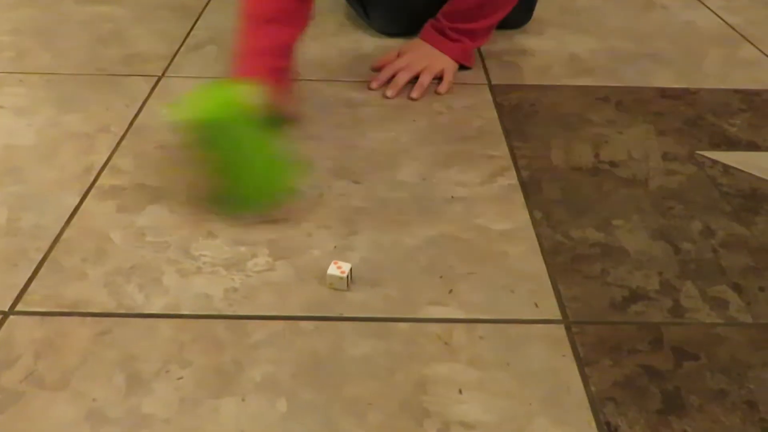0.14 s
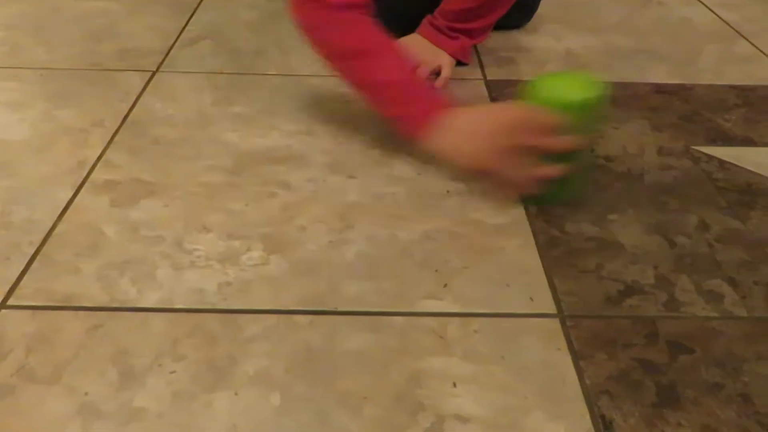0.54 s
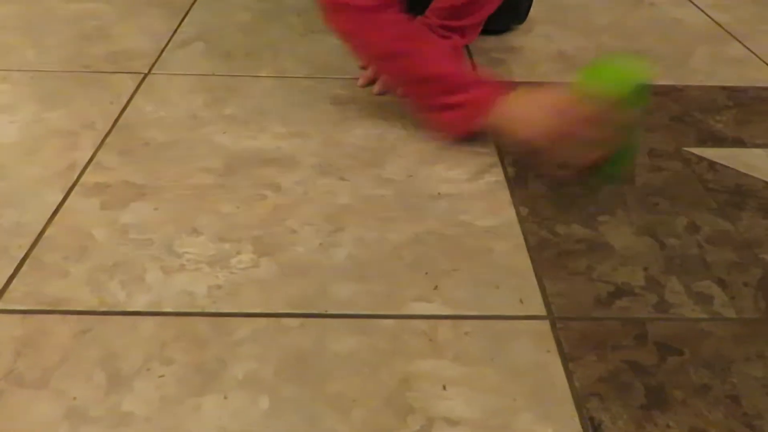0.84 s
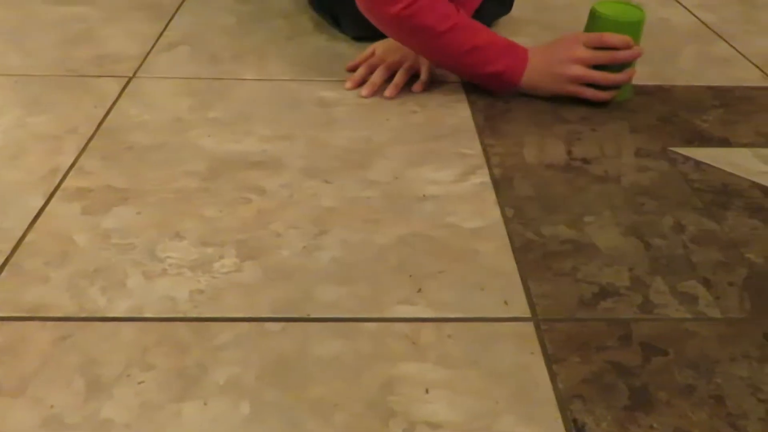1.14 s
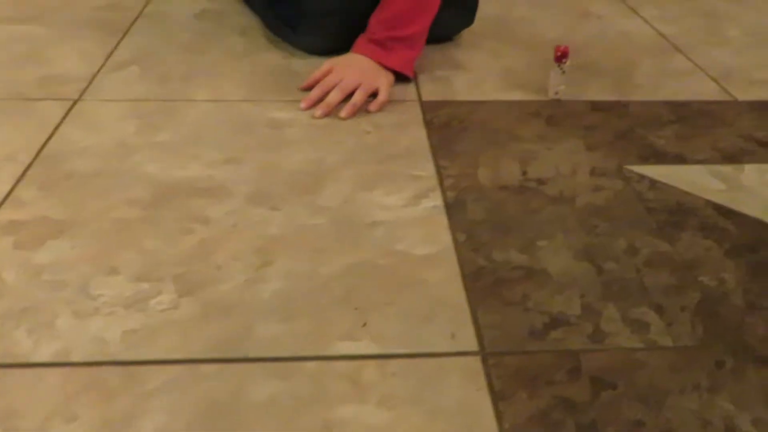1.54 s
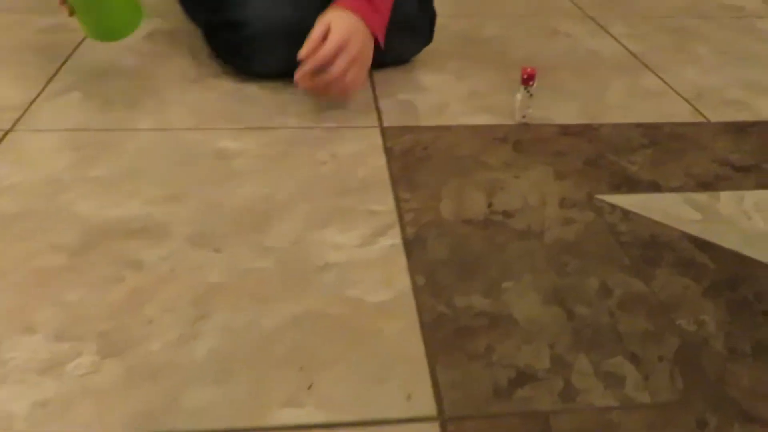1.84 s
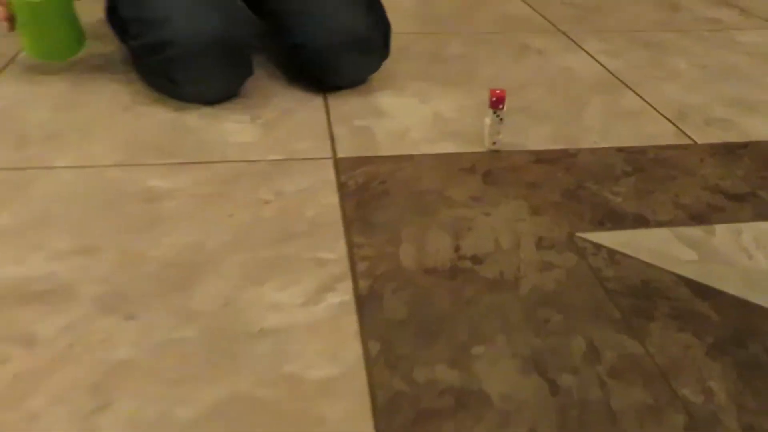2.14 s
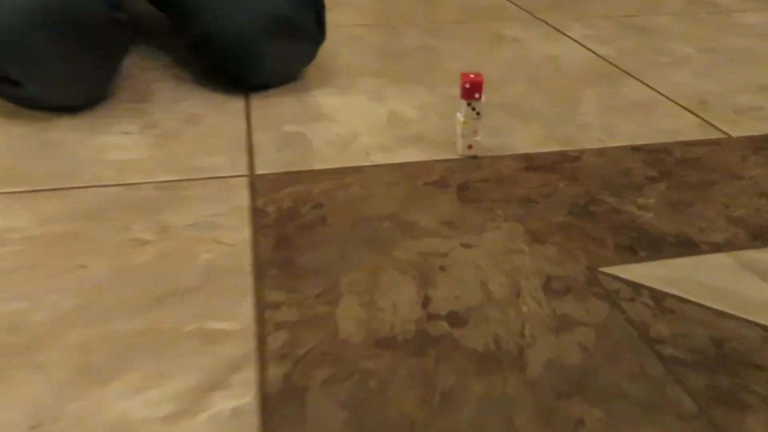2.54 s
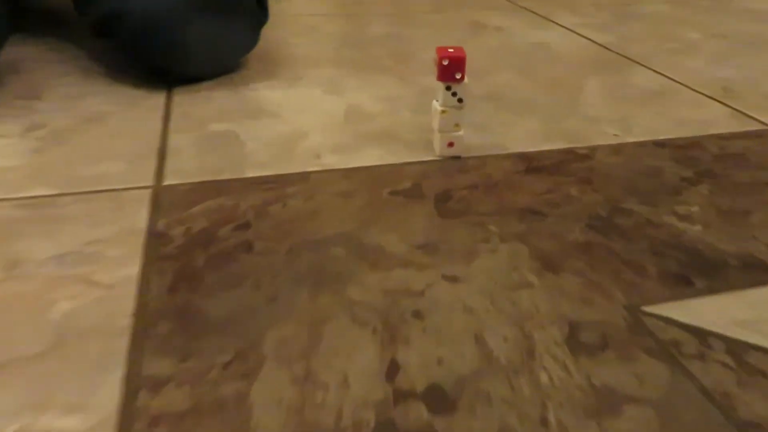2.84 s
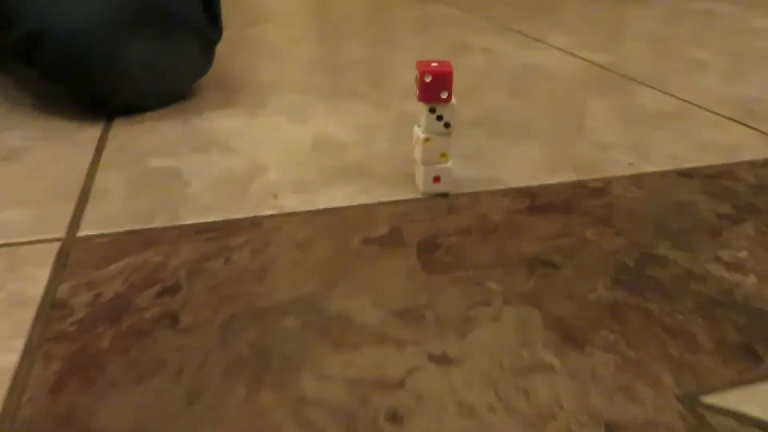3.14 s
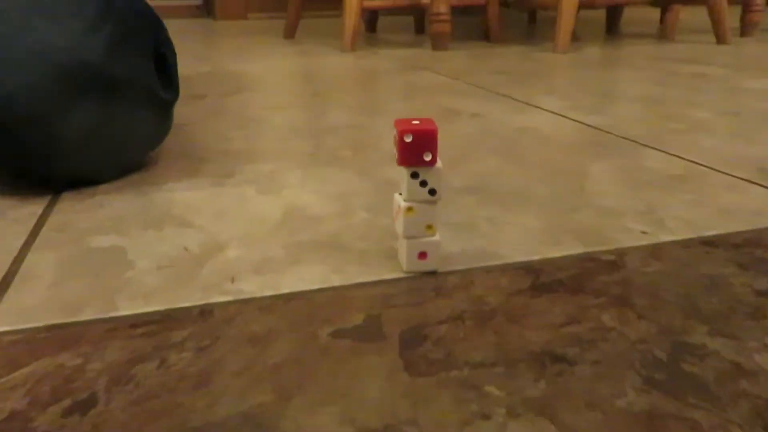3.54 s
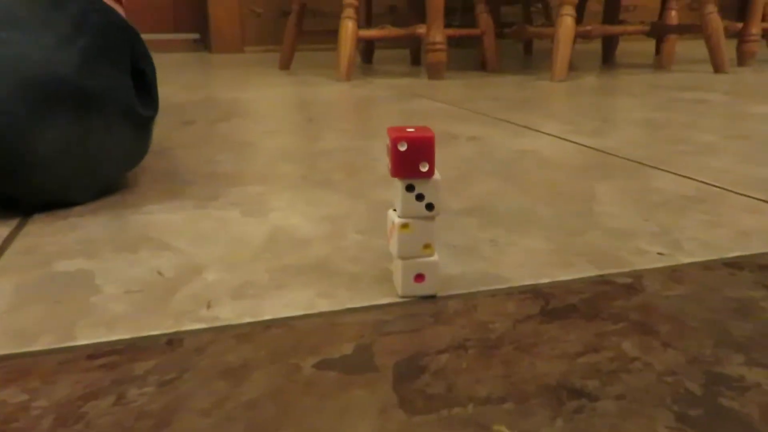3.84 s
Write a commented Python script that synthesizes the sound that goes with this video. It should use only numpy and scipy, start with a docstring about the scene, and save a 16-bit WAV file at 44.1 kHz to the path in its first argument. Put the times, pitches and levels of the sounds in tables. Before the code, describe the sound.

Dice rattle in a plastic cup from the start, grinding and clacking with hollow hoots at the swings, hardest around 0.45-0.5 seconds. From 0.64 the cup scrapes grittily over hard tile, stopping sharply at 1.0 with a short bright room echo. Low hum and rumble swell with soft hiss. A strong dull knock lands at 2.8 with a faint hollow tone, then light scuffs at 3.05 and weaker knocks at 3.3 and 3.8, with barely audible squeaks.

```python
"""Dice in a swung cup

Dice, modelled as friction bursts and clicks, grind and clack round a plastic cup swung from side to side;
its air column, a stirred resonance and short sine swells, hoots at each turn.
The cup comes down on floor tiles, scrapes along and stops; decaying noise makes the hard room ring on.
A low hum, rumble and hiss come up, with a few dull knocks (pulses), a hollow tone, scuffing taps (noise)
and faint squeaks (jittered sines)."""
import sys
import numpy as np
from scipy import signal
from scipy.fft import rfft, irfft, next_fast_len
from scipy.io import wavfile
from scipy.ndimage import map_coordinates

SR = 44100
rng = np.random.default_rng(int(sys.argv[2]) if len(sys.argv) > 2 else 0)


def pcm_store(signal):
    """Save signal as 16-bit PCM."""
    levels = np.round(np.clip(np.atleast_2d(signal), -1, 1) * 32767)
    wavfile.write(sys.argv[1], SR, levels.astype(np.int16).T)


N = 176400

# Contact with the tiles, and fade at its end
SCRAPE_START_S, SCRAPE_STOP_S, RELEASE_S = 0.635, 1.009, 0.016

# Resonances of the plastic wall: centre_hz, width_hz, level_db
CUP_MODES = [(860, 140, -8), (1028, 27, -8.5), (1540, 19, -4), (1595, 45, 11.5), (1603, 120, 4),
             (1890, 10, 7), (2070, 190, -1.5), (2473, 72, 0), (2631, 20, -6.5), (2976, 28, -2.5),
             (3440, 38, -3.5), (5060, 110, -6.5)]
# Dice sliding on the wall: time_s, level_db
SLIDE = [(0.0, -37), (0.238, -34), (0.314, -50.5), (0.322, -33), (0.362, -40.5), (0.372, -34.5),
         (0.384, -37), (0.438, -31.5), (0.446, -21), (0.496, -33), (0.502, -35.5), (0.534, -33),
         (0.63, -41.5)]
# Colour of the sliding: freq_hz, level_db
SLIDE_COLOUR = [(120, -74.5), (200, -51), (283, -20.5), (378, -15.5), (564, 1), (677, -18.5), (742, 1),
                (1190, -9.5), (1620, -14.5), (2750, -17), (3360, -17.5), (3900, -18.5), (5100, -17.5),
                (12000, -30.5), (15500, -40)]
# Air column stirred by the dice: time_s, level_db, pitch_hz
AIR_COLUMN = [(0, -30, 658.3), (.06, -34, 676.3), (.115, -36.5, 626.8), (.17, -34, 591.5),
              (.24, -29.5, 603.3), (.31, -41, 620), (.39, -41, 650), (.45, -23, 670.8), (.53, -54, 609),
              (.62, -36.5, 613), (.66, -34.5, 498.8), (.73, -50.5, 471.3), (.795, -29.5, 527),
              (.84, -50, 571), (.9, -40.5, 561)]
# Hollow bumps: dice against the wall at the turns, then two more during the scrape: start_s, level_db,
# air_pitch_hz, length_s
BUMPS = [(0.134, -17, 590, 0.016), (0.15, -17, 553, 0.014), (.160, -9, 601, 0.026),
         (0.19, -9.5, 591, 0.013), (0.211, -19, 630, 0.011), (0.415, -23, 688, 0.015),
         (0.428, -16, 656, 0.011), (0.4433, -5, 656, 0.011), (.456, -11, 713, 0.0095),
         (0.472, -16.5, 617, 0.013), (0.491, -15.5, 604, 0.014), (.509, -18.5, 556, 0.012),
         (.787, -21, 535, 0.026), (.911, -24, 565, .02)]


def swinging_cup(air_width_hz=75, bump_skew=0.75):
    """Dice grind round the wall and stir the air column; bumps sound as short hollow sine swells."""
    slide_db, = curves(SLIDE)
    air_db, air_hz = curves(AIR_COLUMN)
    rub = contacts(rate_hz=500, scatter_db=3, life_s=0.0008, smooth=0.45)
    wall = amp(-9.5) * unit(resonate(rub, CUP_MODES))
    grind = (unit(coloured(rub, SLIDE_COLOUR)) + wall) * amp(slide_db + 3.5)
    air = hoot(air_hz, air_width_hz, skirt_hz=155) * amp(air_db - 1.0)
    out = grind * gate(0, SCRAPE_START_S, 0.04) + air * gate(0, SCRAPE_STOP_S, RELEASE_S)
    for start_s, level_db, pitch_hz, length_s in BUMPS:
        t = np.arange(int(length_s * SR)) / SR
        swell = np.sin(np.pi * (t / length_s) ** bump_skew)  # skew below 1: rises faster than it dies
        add(out, start_s, amp(level_db) * swell * np.sin(2 * np.pi * pitch_hz * t))
    return out


# Rim and dice over the tiles: time_s, body_db, treble_db, bass_db
SCRAPE = [(0.63, -35, -45.5, -52), (0.664, -26, -36, -31), (0.672, -19.5, -34, -31),
          (0.68, -23.5, -35, -44.5), (0.728, -25, -41.5, -35), (0.804, -32.5, -28, -46),
          (0.81, -19.5, -40.5, -27.5), (0.818, -30, -35.5, -34.5), (0.834, -19.5, -32.5, -37),
          (0.86, -21, -31.5, -52.5), (0.892, -20, -25, -37.5), (0.926, -20.5, -24, -30.5),
          (0.988, -19.5, -29, -54.5), (0.998, -26.5, -36.5, -37.5), (1.012, -11.5, -26.5, -35.5),
          (1.02, -22, -31.5, -43.5)]
# Colours of body, treble and bass: freq_hz, level_db
SCRAPE_BODY = [(150, -57), (400, -31), (620, -17.5), (830, 0), (1100, 3.5), (1300, -1), (1600, 0.5),
               (2000, -5.5), (3000, -20.5), (5000, -48)]
SCRAPE_GRIT = [(1530, -9.5), (2600, -0.5), (3860, -3.5), (4230, -4), (5330, -1), (6610, -7.5), (7910, -5.5),
               (9190, -11.5), (14200, -17.5), (15500, -29)]
SCRAPE_BASS = [(60, -40), (130, -19.5), (250, -7.5), (450, -1), (650, -1.5), (1000, -31)]


def scraping_cup():
    """The rim chatters over the tile and rings the cup; finer grit crunches on top."""
    body_db, grit_db, bass_db = curves(SCRAPE)
    chatter = contacts(rate_hz=1000, scatter_db=2.5, life_s=0.0007, smooth=0.35)
    crunch = contacts(rate_hz=550, scatter_db=3.5, life_s=0.0004, smooth=0.33)
    wall = unit(coloured(resonate(chatter, CUP_MODES), [(150, -33.5), (700, -5.0)]))
    body = amp(-5) * unit(coloured(chatter, SCRAPE_BODY)) + amp(-14.0) * wall
    bass = amp(3.0) * unit(coloured(chatter, SCRAPE_BASS))
    grit = amp(-1) * unit(coloured(crunch, SCRAPE_GRIT))
    scrape = body * amp(body_db) + grit * amp(grit_db) + bass * amp(bass_db)
    return scrape * gate(SCRAPE_START_S, SCRAPE_STOP_S, RELEASE_S)


# Sharp contacts of dice and rim: start_s, click_db, cup_ring_db, tilt_db_per_octave
CLACKS = [(0.055, -40.5, -32, 14), (0.07, -26.5, -36, -10), (.0892, -19, -35, 3.5),
          (0.1222, -28, -33.5, -5.5), (0.1689, -16.5, -44, -3), (.193, -20, -47, 7.5),
          (0.2318, -20.5, -32.5, -0.5), (.290, -23, -36, 12), (0.3222, -18.5, -20, 11),
          (.342, -21.5, -23, 5.5), (0.3707, -19.5, -30, 11), (0.375, -20, -28, 14.5),
          (0.4472, -11.5, -14, -2.5), (0.463, -17, -26, 6), (0.468, -9, -15.5, 1), (.479, -10.5, -27, 0),
          (0.5039, -2, -25.5, -0.5), (.520, -14, -20, -1), (0.5842, -25.5, -26.5, 0.5),
          (0.648, -20, -17.5, -0.5), (0.6701, -20.5, -14, 2.5), (0.704, -28.5, -23, -2.5),
          (.720, -33.5, -20, 7), (.769, -14.5, -43, 10), (0.818, -10, -7.5, 5), (.852, -28.5, -8, -5),
          (.858, -19.5, -9, 0.5), (0.867, -20, -9, -6.5), (.9105, -14.5, -16.5, 3.5),
          (0.926, -12.5, -19.5, -5.5), (0.932, -16.5, -15, -6), (0.957, -16, -13.5, -2.5),
          (.983, -18.5, -21.5, -1), (1.009, -28, -17, -2)]
# Colour of a click before tilt: freq_hz, level_db
CLICK = [(60, -40.5), (200, -48), (1000, 9), (2500, 1), (4000, 3), (5400, 3.5), (7000, -8.5),
         (10000, -10.5), (15000, -15.5)]


def clacks(scatter_t60_s=0.03, scatter_db=-19, ring_t60_s=0.021, ring_scatter_db=3.5,
           tint_db=3, tilt_pivot_hz=2500):
    """Each hard contact clicks in its own colour, scatters inside the cup and rings the wall."""
    out, t = np.zeros((2, N)), np.arange(SR // 12) / SR
    for start_s, click_db, ring_db, tilt_db in CLACKS:
        colour = []
        for hz, db in CLICK:
            tilt = tilt_db * np.log2(hz / tilt_pivot_hz)
            colour.append((hz, db + tilt + tint_db * rng.standard_normal()))
        noise = spread(rng.standard_normal((2, len(t))), ALIKE)
        burst = amp(scatter_db - 60 * t / scatter_t60_s) * noise
        burst[:, 0] += 1  # direct click
        tick = signal.fftconvolve(burst, pulse(colour)[None], axes=1)
        ring = np.zeros(len(t))
        for hz, _, db in CUP_MODES:
            gain = amp(db + rng.normal(0, ring_scatter_db))
            ring += gain * np.sin(2 * np.pi * (hz * t + rng.random()))
        ring *= amp(-60 * t / ring_t60_s)
        add(out, start_s, amp(click_db) * tick / np.abs(tick).max())
        add(out, start_s, amp(ring_db) * ring / np.abs(ring).max())
    return out


# Dull knocks: start_s, peak_db, scale_hz, room_send_db
KNOCKS = [(2.8254, -3, 763, -10.5), (3.2932, -17, 486, -0.5), (3.3027, -18.5, 706, -7.5),
          (3.3055, -20, 850, -4), (3.7846, -26.5, 792, 4.5), (3.8045, -27, 647, -1)]
# Colour of a knock: multiple_of_scale_hz, level_db
KNOCK = [(.1, -56), (.4, -7), (.8, 10.5), (1.3, 1), (2.1, -4.5), (2.6, -42.5), (3.6, -30), (6, -40.5),
         (12, -80.5), (20, -83)]


def knocks(room_db=-4):
    """Short dull pulses that wake the room."""
    dry, send = np.zeros((2, N))
    for start_s, peak_db, scale_hz, send_db in KNOCKS:
        blow = -amp(peak_db) * pulse(KNOCK, scale_hz)
        add(dry, start_s, blow)
        add(send, start_s, amp(send_db) * blow)
    return dry + amp(room_db) * room(send[None])


# Hollow tone after the hardest knock: time_s, level_db, pitch_hz
LINGER = [(2.832, -19, 651), (2.856, -28.5, 672.4), (2.899, -33.5, 697), (2.972, -35.5, 705),
          (3.057, -42.5, 660), (3.181, -48, 730), (3.218, -41.5, 619), (3.269, -46.5, 779),
          (3.36, -58, 767)]


def lingering_tone():
    """A randomly stirred resonance wavers in pitch and dies away."""
    level_db, pitch_hz = curves(LINGER)
    tone = hoot(pitch_hz, width_hz=174, skirt_hz=129)
    return tone * amp(level_db) * gate(LINGER[0][0], LINGER[-1][0], 0.0028)


# Light scuffing taps: start_s, level_db, brightness_ratio, t60_s
TAPS = [(3.043, -32, 0.95, 0.028), (3.0647, -22, .93, 0.036), (3.072, -28, 0.91, .025),
        (3.782, -33, 0.97, 0.022)]
# Colour of a tap at brightness 1: freq_hz, level_db
TAP = [(100, -8), (400, 6), (900, 8.5), (1400, -2.5), (2100, 3), (2700, -11), (4000, -21.5), (6000, -31),
       (14000, -67)]


def taps(room_db=-2):
    """Short decaying bursts of noise, roughened by a fast wobble, with their room answer."""
    out, t = np.zeros((2, N)), np.arange(SR // 6) / SR
    for start_s, level_db, brightness, t60_s in TAPS:
        noise = spread(rng.standard_normal((2, len(t))), ROOM_ALIKE)
        grit = amp(4 * wobble(rate_hz=700)[:len(t)]) * noise
        scuff = coloured(grit, [(hz * brightness, db) for hz, db in TAP])
        attack = 1 - np.exp(-t / 0.0012)
        add(out, start_s, unit(scuff) * amp(level_db - 60 * t / t60_s) * attack)
    return out + amp(room_db) * room(out)


# Faint squeaks: start_s, level_db, pitch_hz, length_s
SQUEAKS = [(2.861, -45.5, 3000, 0.013), (3.905, -49.5, 2140, .012), (3.924, -50.5, 2055, 0.022)]


def squeaks():
    """Brief faint tones roughened by random phase steps."""
    out = np.zeros(N)
    for start_s, level_db, pitch_hz, length_s in SQUEAKS:
        n = int(length_s * SR)
        phase = np.cumsum(2 * np.pi * pitch_hz / SR + 0.095 * rng.standard_normal(n))
        add(out, start_s, amp(level_db) * np.hanning(n) * np.sin(phase))
    return out


# Levels over time: time_s, hum_db, hiss_db
BACKGROUND = [(0, -58.5, -84.5), (1, -54.5, -57.5), (1.65, -45, -65.5), (2.3, -40, -60), (2.7, -35, -54.5),
              (2.93, -34, -58), (3.35, -35, -55), (3.65, -35, -57.5), (4, -33, -56.5)]
# Partials of the hum: multiple, level_db
HUM = [(1, -3.5), (2, -8), (3, -22)]
# Colours of the noises: freq_hz, level_db
RUMBLE = [(20, -19), (44, -7), (65, 2), (85, -2.5), (115, -1), (165, -6), (230, -7.5), (330, -12.5),
          (600, -17.5), (1000, -33), (2000, -59.5)]
HISS = [(470, -35.5), (800, 1), (1860, -3.5), (2160, -4), (4910, -11), (7640, -16.5), (13100, -25),
        (15000, -28)]
# Background: freq_hz, left_right_likeness
FLOOR_ALIKE = [(90, .9999), (250, 0.94), (600, 0.38), (1100, -0.1), (2300, -0.16), (9000, -0.42)]


def background(hum_hz=54.9):
    """Harmonic hum with uneven rumble, and hiss; all end louder than they start."""
    hum_db, hiss_db = curves(BACKGROUND)
    t = np.arange(N) / SR
    hum = np.zeros(N)
    for multiple, db in HUM:
        hum += amp(db) * np.sqrt(2) * np.sin(2 * np.pi * (multiple * hum_hz * t + rng.random()))
    rumble = unit(coloured(spread(rng.standard_normal((2, N)), FLOOR_ALIKE), RUMBLE))
    rumble = rumble * amp(1.2 * wobble(rate_hz=12))
    hiss = unit(coloured(spread(rng.standard_normal((2, N)), FLOOR_ALIKE), HISS))
    return amp(hum_db) * (hum + amp(-6) * rumble) + amp(hiss_db + 2.0) * hiss


# Decay: freq_hz, t60_s
ROOM_T60 = [(200, 0.8), (800, 0.82), (1700, 1.097), (5500, 0.64), (9000, 0.34), (14000, 0.27)]
# Colour: freq_hz, level_db
ROOM_COLOUR = [(150, 0.5), (600, -4), (1200, -2.5), (2000, -6), (5000, -4.5), (14000, 1.5)]
# Room sound: freq_hz, left_right_likeness
ROOM_ALIKE = [(40, .999), (250, 0.97), (600, 1), (2300, 0.97), (4500, 0.7), (9000, .1)]


def room(x, delay_samples=180):
    """Diffuse answer of the tiled room: decaying noise whose treble dies first."""
    hz, t, z = signal.stft(rng.standard_normal((2, SR)), SR, nperseg=256)
    decay = amp(-60 * t / along(ROOM_T60, hz)[:, None])
    tail = signal.istft(z * decay, SR, nperseg=256)[1]
    tail = coloured(spread(tail / np.linalg.norm(tail[0]), ROOM_ALIKE), ROOM_COLOUR)
    tail = np.pad(tail, ((0, 0), (delay_samples, 0)))
    return signal.fftconvolve(x, tail, axes=1)[:, :N]


# Direct sound: freq_hz, left_right_likeness
ALIKE = [(40, .999), (200, 0.97), (600, 1), (1200, 0.98), (2300, 0.87), (4500, 0.75), (9000, 0.34),
         (15000, 0.13)]


def contacts(rate_hz, scatter_db, life_s, smooth):
    """Stereo friction: tiny bursts at random moments over a smooth rub."""
    strength = amp(scatter_db * np.clip(rng.standard_normal(N), -2, 2)) ** 2
    hits = (rng.random(N) < rate_hz / SR) * strength
    power = signal.lfilter([1], [1, -np.exp(-1 / (life_s * SR))], hits)
    level = np.sqrt(power / power.mean() + smooth)
    return spread(rng.standard_normal((2, N)) * level, ALIKE)


def hoot(pitch_hz, width_hz, skirt_hz):
    """A randomly stirred resonance of rms 1 that follows a pitch curve."""
    lowpass = lambda hz: 1 / (1 + 2j * hz / width_hz) / (1 + 1j * hz / skirt_hz)
    stir = filtered(rng.standard_normal((2, N)), lowpass)
    carrier = np.exp(2j * np.pi * np.cumsum(pitch_hz) / SR)
    return unit(np.real((stir[0] + 1j * stir[1]) * carrier))


def wobble(rate_hz):
    """A smooth random curve, rate_hz knots a second."""
    knots = rng.standard_normal(int(N * rate_hz / SR) + 4)
    return map_coordinates(knots, [np.arange(N) * rate_hz / SR])


def resonate(x, modes):
    """x through parallel resonances of alternating sign: centre_hz, width_hz, level_db."""
    def response(f):
        total = 0
        for k, (c, w, db) in enumerate(modes):
            total = total + (-1) ** k * amp(db) * 1j * f * w / (c * c - f * f + 1j * f * w)
        return total
    return filtered(x, response)


def pulse(spectrum, scale=1, size=4096):
    """A causal minimum-phase pulse of peak 1 with the given colour."""
    hz = np.fft.rfftfreq(size, 1 / SR)
    cepstrum = irfft(np.log(amp(along(spectrum, hz / scale))))
    cepstrum[1:size // 2] *= 2
    cepstrum[size // 2 + 1:] = 0
    p = irfft(np.exp(rfft(cepstrum)))
    return p / np.abs(p).max()


def spread(pair, alike):
    """Two unrelated signals to left and right with the given likeness."""
    turn = lambda hz: np.arccos(np.clip(along(alike, hz), -1, 1)) / 2
    mid, side = filtered(pair, lambda hz: np.array([np.cos(turn(hz)), np.sin(turn(hz))]))
    return np.array([mid + side, mid - side])


def filtered(x, response):
    """x times a response of frequency."""
    n = x.shape[-1]
    m = next_fast_len(n + 8192)
    return irfft(rfft(x, m) * response(np.fft.rfftfreq(m, 1 / SR)), m)[..., :n]


def coloured(x, spectrum):
    """x through (freq_hz, level_db) points."""
    return filtered(x, lambda hz: amp(along(spectrum, hz)))


def along(points, hz):
    """Read (freq_hz, value) points on a log axis."""
    f, v = np.transpose(points)
    return np.interp(np.log(hz + 1e-3), np.log(f + 1e-3), v)


def curves(rows):
    """One value per sample for each column after the time."""
    s, *cols = np.transpose(rows)
    return [np.interp(np.arange(N) / SR, s, c) for c in cols]


def gate(start_s, stop_s, fade_s):
    """One between start and stop, with fades outside."""
    t = np.arange(N) / SR
    return np.clip(1 + (t - start_s) / fade_s, 0, 1) * np.clip(1 + (stop_s - t) / fade_s, 0, 1)


def add(track, start_s, sound):
    """Mix a sound in at start_s."""
    i = max(round(start_s * SR), 0)
    track[..., i:i + sound.shape[-1]] += sound[..., :N - i]


def amp(db):
    """Decibels to gain."""
    return 10 ** (np.asarray(db) / 20)


def unit(x):
    """Scale to rms 1."""
    return x / np.sqrt(np.mean(x ** 2) + 1e-20)


# Place of the cup: time_s, left_minus_right_db
SWING = [(0.0, 1), (0.118, -0.5), (0.32, 1.5), (0.558, -2), (0.82, 1.0), (0.934, -1), (1.05, -0.5)]


def scene():
    """The cup in its room, with the knocks and the background."""
    pan_db, = curves(SWING)
    cup = swinging_cup() + scraping_cup() + clacks()
    cup = cup * amp(np.array([pan_db, -pan_db]) / 2)
    nearby = knocks() + lingering_tone() + taps() + squeaks()
    return amp(-0.5) * cup + amp(-7.0) * room(cup) + nearby + background()


def record(dry, top_hz=15900):
    """Nothing is kept above the band limit."""
    return filtered(dry, lambda hz: hz < top_hz)


dry = scene()
out = record(dry)
pcm_store(out)
```